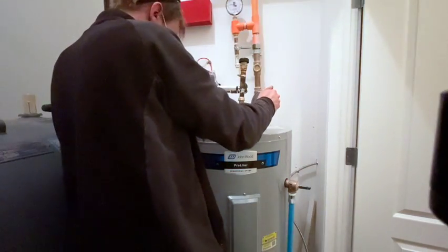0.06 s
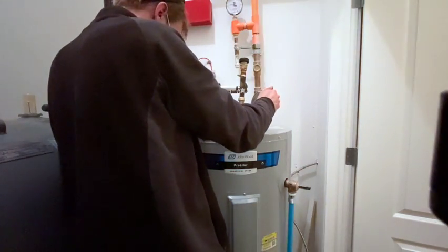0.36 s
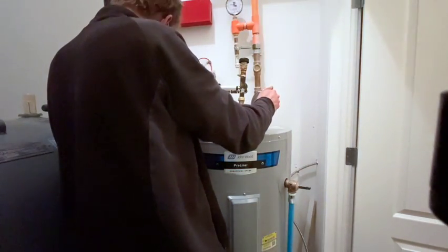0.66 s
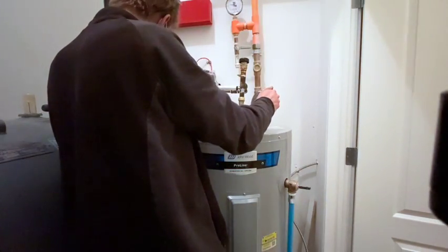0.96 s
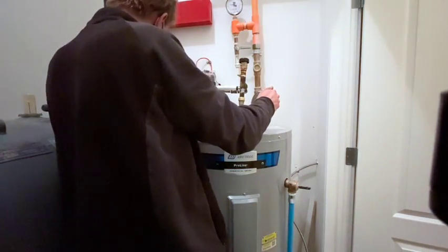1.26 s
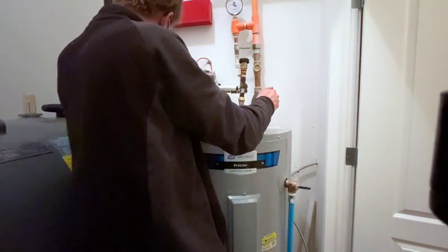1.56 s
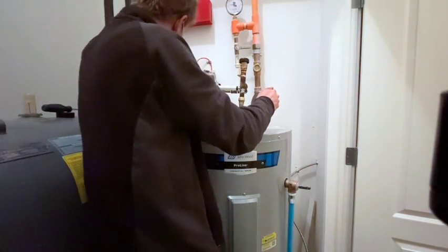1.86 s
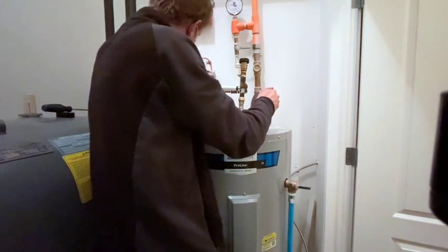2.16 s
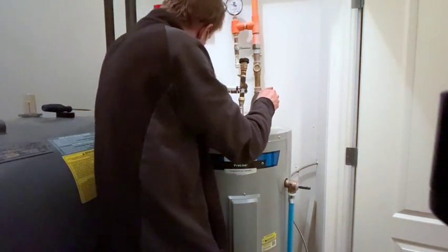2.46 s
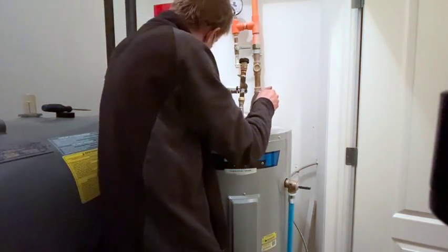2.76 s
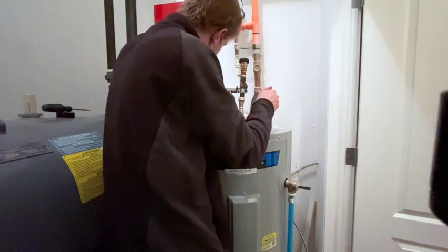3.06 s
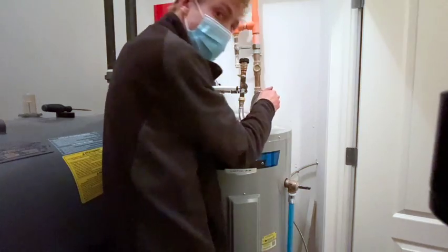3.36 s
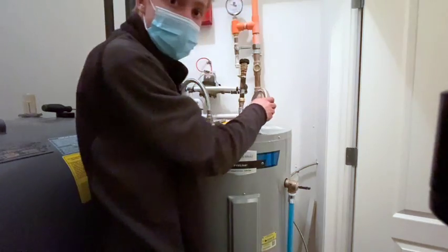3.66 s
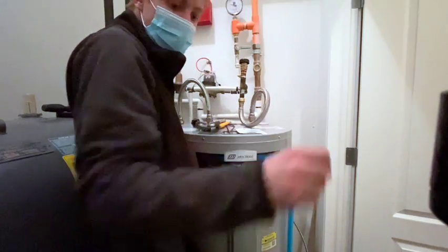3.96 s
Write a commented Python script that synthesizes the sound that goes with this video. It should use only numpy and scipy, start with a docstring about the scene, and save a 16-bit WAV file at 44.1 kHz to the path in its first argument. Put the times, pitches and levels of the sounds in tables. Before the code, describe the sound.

Water rushes steadily through pipes into a tank, hissing over a hollow roar.

```python
"""A bright, rushing hiss over a hollow roar: water runs through a valve and pipes into a tank.
Turbulence and tiny collapsing bubbles excite the pipe resonances; the tank roars, rings and gurgles.
The hard walls of the small utility room add a short tail, and a mains hum lies underneath.
Air and handling rumble on the microphone, stronger in the second half, with soft thuds and scuffs
as someone shifts about."""
import sys
import numpy as np
from scipy import signal
from scipy.fft import rfft, irfft
from scipy.io import wavfile
from scipy.ndimage import uniform_filter1d

SR = 44100
rng = np.random.default_rng(int(sys.argv[2]) if len(sys.argv) > 2 else 0)


def log_audio(samples):
    """Write samples as a 16-bit WAV file to the path given in sys.argv[1]."""
    # one column per channel
    frames = np.atleast_2d(samples).T
    # limit to full scale, then quantise
    limited = np.clip(frames, -1, 1)
    pcm = np.round(limited * 32767).astype(np.int16)
    wavfile.write(sys.argv[1], SR, pcm)


N = 176400


def undb(db):
    """Amplitude ratio: a factor of ten for every 20 dB."""
    return 10 ** (np.asarray(db) / 20)


def unit(x):
    """Normalisation to rms 1."""
    return x / np.sqrt(np.mean(x ** 2))


def times():
    """Uniform sampling: the time of each sample in seconds."""
    return np.arange(N) / SR


def fade(curve):
    """Amplitude envelope through points of time_s, level_db."""
    return undb(np.interp(times(), *np.array(curve).T))


def noise():
    """White noise: equal mean power at all frequencies."""
    return rng.standard_normal(N)


def walk(rate_hz):
    """Slow random modulation: held values, smoothed twice; rms 1."""
    hold = int(SR / rate_hz)
    steps = noise()[np.arange(N) // hold]
    return unit(uniform_filter1d(uniform_filter1d(steps, hold), hold))


def colour(x, points):
    """Spectral shaping by points of frequency_hz, gain_db, rolling off beyond both ends; rms 1."""
    hz, db = np.array(points).T
    f = np.maximum(np.fft.rfftfreq(N, 1 / SR), .1)
    roll_off = (np.minimum(f / hz[0], 1) * np.minimum(hz[-1] / f, 1)) ** 2
    gain = undb(np.interp(np.log(f), np.log(hz), db))
    return unit(irfft(rfft(x) * roll_off * gain, N))


def ring(x, hz, stage_width_hz):
    """Forced resonance: two equal band-passes in series; rms 1."""
    f = np.fft.rfftfreq(N, 1 / SR)
    band = 1j * f * stage_width_hz / (hz ** 2 - f ** 2 + 1j * f * stage_width_hz)
    return unit(irfft(rfft(x) * band ** 2, N))


def turbulence(bubbles_per_s=3000, spread_db=3):
    """Broadband flow noise with the impulses of tiny collapsing bubbles; rms 1."""
    strength = undb(spread_db * np.minimum(rng.exponential(size=N), 7))
    clicks = (rng.random(N) < bubbles_per_s / SR) * strength * np.sign(noise())
    return unit(noise() + undb(-5) * unit(clicks))


def room(x, t60_s=0.23, wet_db=-6):
    """Reverberation: dense reflections from close hard walls decay exponentially."""
    t = times()[:SR // 2]
    tail = noise()[:len(t)] * np.exp(-np.log(1000) * t / t60_s)
    padded = np.pad(x, (len(t) - 1, 0), mode="reflect")  # the room is already sounding at the start
    wet = signal.fftconvolve(padded, tail / np.linalg.norm(tail), mode="valid")
    return (x + undb(wet_db) * wet) / np.hypot(1, undb(wet_db))


def hum(pitch_hz=120, fade_db_per_s=-1.5, waver_db=0.6):
    """Mains hum: a pure tone at twice the line frequency wavers and grows fainter."""
    level_db = -47 + fade_db_per_s * times() + waver_db * walk(rate_hz=3.57)
    return np.sqrt(2) * np.sin(2 * np.pi * pitch_hz * times()) * undb(level_db)


def rumble():
    """Slow air pressure fluctuations and swells of structure-borne handling noise on the microphone."""
    # Spectrum of the moving air: frequency_hz, gain_db
    draught_spectrum = [(1, -0.5), (3, -3), (5.5, 1), (10, -6), (18, -5.5), (24, -24.5), (36, -30),
                        (50, -29), (60, -38), (76, -34.5), (95, -43), (200, -62)]
    # Spectrum of the handling: frequency_hz, gain_db
    handling_spectrum = [(6, -24), (12, -13), (18, 4), (27, -2.5), (36, -10), (44, -21), (50, -12.5),
                         (60, -25.5), (80, -26), (110, -33.5), (250, -55)]
    # Swells of the handling: time_s, level_db
    swells = [(0, -34), (1.9, -40), (2.12, -21), (2.22, -26), (2.38, -18.5), (2.45, -21.5), (2.62, -23),
              (2.88, -28.5), (3.0, -17), (3.2, -22.5), (3.38, -19), (3.5, -23), (3.65, -16), (3.78, -21),
              (3.9, -12.5), (4, -14)]
    draught = colour(noise(), draught_spectrum) * undb(-22.5)
    return draught + colour(noise(), handling_spectrum) * fade(swells)


def scuffs():
    """Friction noise: cloth rubs in short, dull bursts with Gaussian envelopes."""
    # Rubs of cloth: peak_s, sigma_s, level_db
    rubs = [(3.347, 0.033, -39), (3.637, 0.022, -38), (3.837, 0.056, -38), (3.997, 0.03, -33)]
    # Spectrum of the rubbing: frequency_hz, gain_db
    spectrum = [(70, -4), (130, 0), (220, 4.5), (400, -8.5), (700, -22), (2000, -35), (6000, -41.5)]
    envelope = sum(undb(db) * np.exp(-((times() - at) / sigma) ** 2 / 2) for at, sigma, db in rubs)
    return colour(turbulence(), spectrum) * envelope


def thuds(rise_s=0.02, decay_s=0.036, roughness=.3):
    """Damped vibration: each soft bump swells into a low, rough boom and dies exponentially."""
    # Soft bumps: peak_s, pitch_hz, level_db
    bumps = [(1.45, 77.6, -34), (1.724, 76, -30), (2.068, 76.4, -28.5), (2.295, 76, -25.5),
             (2.45, 52.3, -27.5), (2.698, 81.3, -29.5), (3.95, 122, -27.5)]
    out = np.zeros(N)
    for at, hz, db in bumps:
        t = times() - at
        envelope = np.exp(-(np.minimum(t, 0) / rise_s) ** 2 - np.maximum(t, 0) / decay_s)
        tone = np.sqrt(2) * np.sin(2 * np.pi * (hz * t + rng.random()))
        boom = tone + roughness * ring(noise(), hz, stage_width_hz=84)
        out += undb(db) * envelope * boom
    return out


def gurgle(bubbles_per_s=170, low_hz=492.5, high_hz=2820, decay_cycles=4.5, rise=0.033, spread_db=3.5):
    """Bubble resonance: each rings briefly, rising a little in pitch; large ones are lower and louder."""
    out = np.zeros(N + 2048)
    t = np.arange(2048) / SR
    for when, pitch, strength in rng.random((int(bubbles_per_s * N / SR), 3)):
        hz = low_hz * (high_hz / low_hz) ** pitch
        age = hz * t / decay_cycles
        gain = undb(spread_db * min(-np.log(1 - strength), np.pi)) / hz
        start = int(when * N)
        out[start:start + len(t)] += gain * np.exp(-age) * np.sin(2 * np.pi * hz * t * (1 + rise * age))
    return unit(out[:N]) * undb(-50)


def tank(mode_fade_db_per_s=-1):
    """Modal excitation: churning water roars, gurgles and drives narrow modes of tank and room."""
    # Spectrum of the churning water: frequency_hz, gain_db
    spectrum = [(60, -8), (150, 2.5), (205, -0.5), (280, 3.5), (450, -2), (530, 1), (590, -4.5), (680, -1),
                (880, 0), (1050, -5), (1250, -4.5), (1500, -12), (2200, -23.5), (4000, -45)]
    # Modes of tank and room: pitch_hz, width_hz, level_db
    modes = [(279.7, 12.5, -52.5), (331, 18, -52), (368.4, 10.9, -47.5), (418.3, 15.5, -47.5),
             (449.3, 23, -49.5), (492.6, 12, -50), (778, 9.3, -55), (905.6, 11, -55), (1024, 6.1, -53.5),
             (1053, 11.6, -58), (1181, 17, -55.5), (1270, 7.7, -60.5), (2752, 43, -60)]
    # Envelope of roar, modes and gurgle together: time_s, gain_db
    envelope = [(0, 0), (.25, 0.5), (.62, -.5), (1.0, -0.5), (1.5, 0.1), (1.85, -2.5), (1.98, -0.5),
                (2.2, -1.3), (2.7, -2.5), (2.95, -0.5), (3.5, -1.2), (3.72, -3), (3.83, -1), (4, -7)]
    roar = colour(turbulence(), spectrum) * undb(-41)
    ringing = sum(ring(noise(), hz, width * np.sqrt(2)) * undb(db) for hz, width, db in modes)
    ringing *= undb(mode_fade_db_per_s * times())
    return (roar + ringing + room(gurgle())) * fade(envelope)


def valve(width_hz=270):
    """A moving resonance: a narrow band of hiss shifts in pitch and strength as the valve is handled."""
    # Path of the valve's resonance: time_s, pitch_hz, level_db
    path = [(0, 4200, -53), (2.0, 4168, -54), (2.14, 4160, -46.5), (2.28, 4212, -46), (2.311, 3953, -51),
            (2.46, 3918, -51.5), (2.56, 3988, -57), (2.8, 4063, -51), (3.101, 4071, -52.5),
            (3.55, 4227, -45), (3.8, 4153, -49.5), (4, 4215, -52.5)]
    at, hz, db = np.array(path).T
    band = ring(turbulence(), hz.mean(), width_hz * np.sqrt(2))
    shift_cycles = np.cumsum(np.interp(times(), at, hz) - hz.mean()) / SR
    shifted = np.real(signal.hilbert(band) * np.exp(2j * np.pi * shift_cycles))
    return shifted * undb(np.interp(times(), at, db))


def pipes(flutter_hz=23.82, mode_flutter_db=1.2, overall_flutter_db=.35):
    """Flow-excited resonance: turbulence hisses and drives pipe modes that each flutter on their own."""
    # Spectrum of the flow through the valve: frequency_hz, gain_db
    hiss_spectrum = [(1300, -2.5), (1700, 1), (2150, -2), (3000, -3), (3700, -0.5), (4600, 1), (5500, -3.5),
                     (6900, -1), (7700, 0), (8300, -3.5), (8620, -1), (9000, -1.5), (9700, 1),
                     (10500, -0.5), (11800, -3.5), (12600, -5.5), (14200, -10), (15600, -15)]
    # Envelope of the hiss: time_s, gain_db
    hiss_envelope = [(0, -0.7), (.2, -0.2), (.36, 2), (.52, -2.5), (.6, 1), (1.15, -0.3), (1.45, 0.6),
                     (1.8, -2.5), (2.06, 0.7), (2.22, -1.7), (2.28, 2), (2.35, -2.6), (2.42, -1.5),
                     (3.45, -2.5), (3.6, -2.5), (3.82, -1.7), (3.92, -4.5), (4, -2.5)]
    # Resonances of the pipe: pitch_hz, width_hz, start_gain_db, end_gain_db
    modes = [(2620, 240, -5, -12.5), (3125, 85, -16.5, -12.5), (5020, 390, -0.5, -5), (6073, 270, -8, 0.5),
             (6298, 320, 2, 0), (7480, 250, -3, -18), (8290, 250, -3, -6), (9060, 340, -2.5, -4.5),
             (9630, 190, -3.5, -20), (11400, 310, -4.5, -14.5), (12300, 170, -10, -22),
             (13200, 330, -10, -17)]
    # Envelope of the pipe's ringing: time_s, gain_db
    ring_envelope = [(0, -2), (.16, -1.5), (.24, 0.2), (.4, 0.7), (.52, -2.5), (.64, -0.5), (1.55, 0),
                     (1.8, -1.5), (2.12, 0), (2.28, -2), (2.36, -4), (2.41, -.5), (2.95, 0), (3.44, 0.5),
                     (3.6, -4), (3.76, 1), (3.9, -3.5), (4, -4)]
    hiss = colour(turbulence(), hiss_spectrum) * undb(-41) * fade(hiss_envelope)
    ringing = np.zeros(N)
    for hz, width, start_db, end_db in modes:
        mode = ring(turbulence(), hz, width * np.sqrt(2))
        ringing += mode * undb(np.linspace(start_db, end_db, N) + mode_flutter_db * walk(flutter_hz))
    ringing *= undb(-46.5) * fade(ring_envelope)
    return (hiss + ringing + valve()) * undb(overall_flutter_db * walk(flutter_hz))


def scene():
    """Superposition: pipes in the room, tank, hum and the low sounds near the microphone, in mono."""
    return (room(pipes()) + tank() + hum() + rumble() + thuds() + scuffs())[None]


def record(dry):
    """Band limiting: a steep elliptic low-pass cuts the highest treble."""
    cutoff_hz = 15700
    return signal.sosfilt(signal.ellip(10, .1, 80, cutoff_hz, fs=SR, output="sos"), dry)


dry = scene()
out = record(dry)
log_audio(out)
```